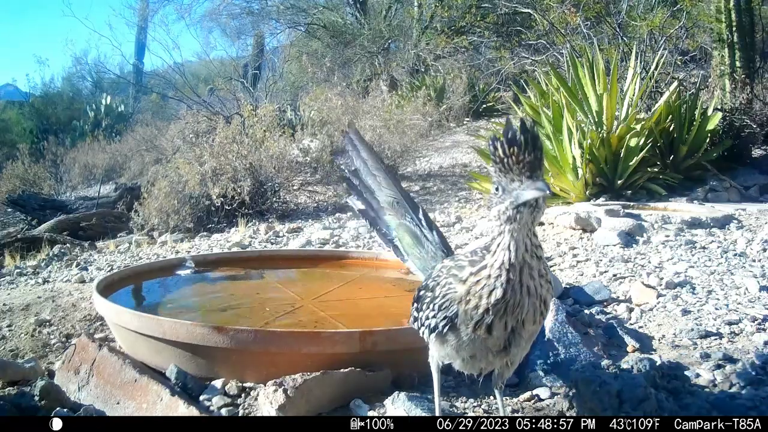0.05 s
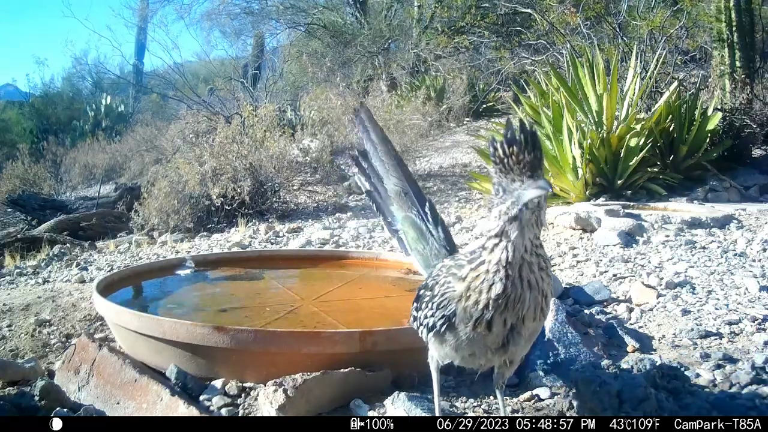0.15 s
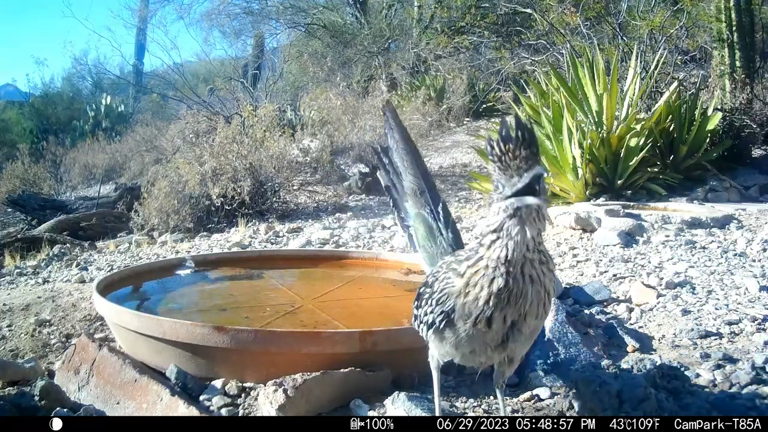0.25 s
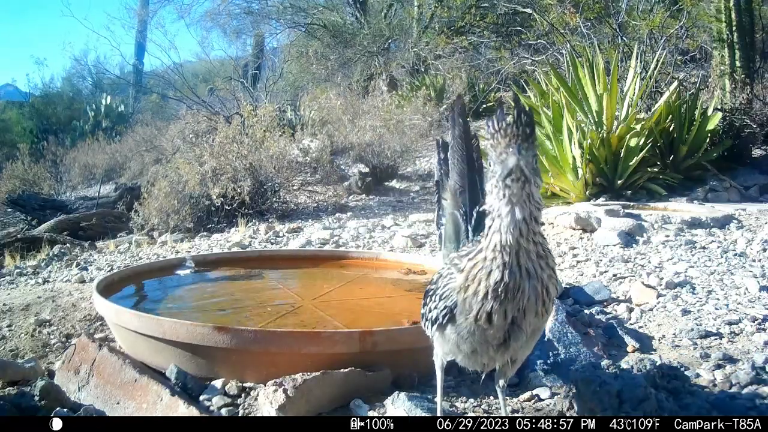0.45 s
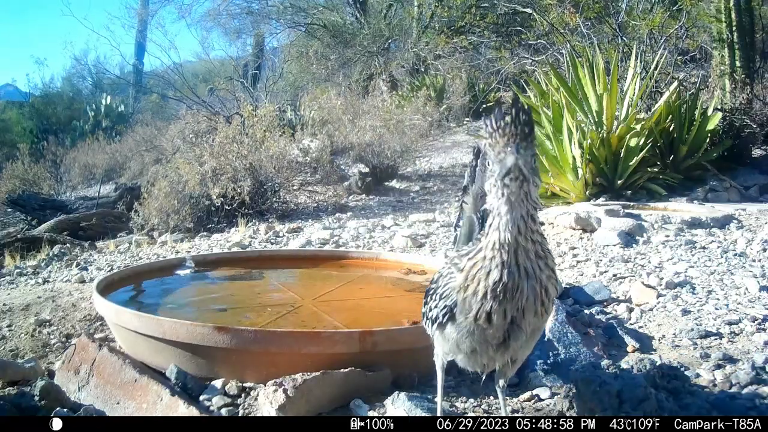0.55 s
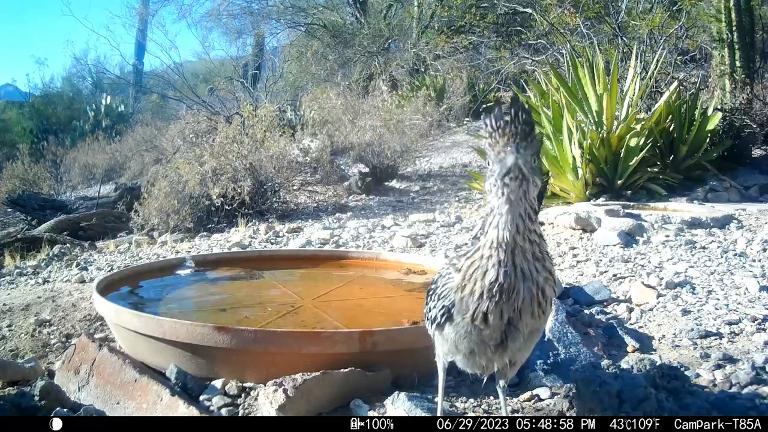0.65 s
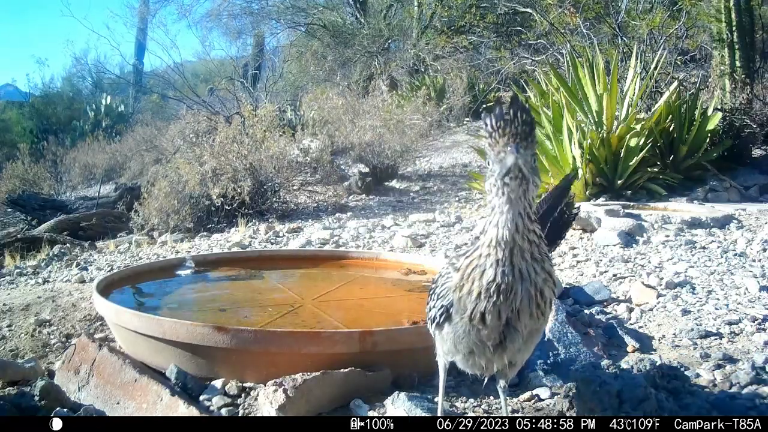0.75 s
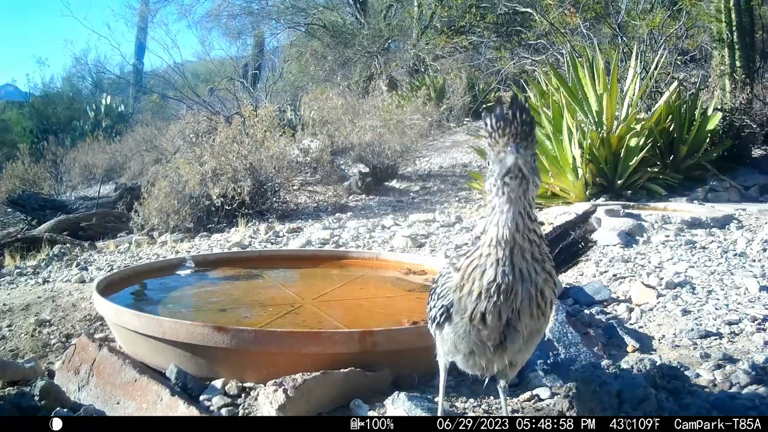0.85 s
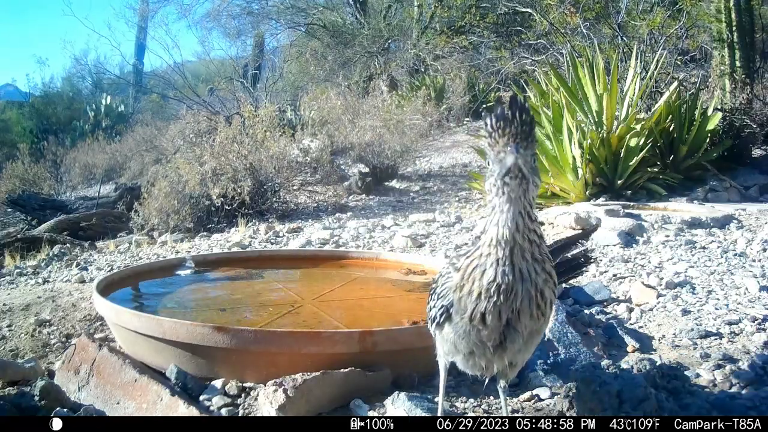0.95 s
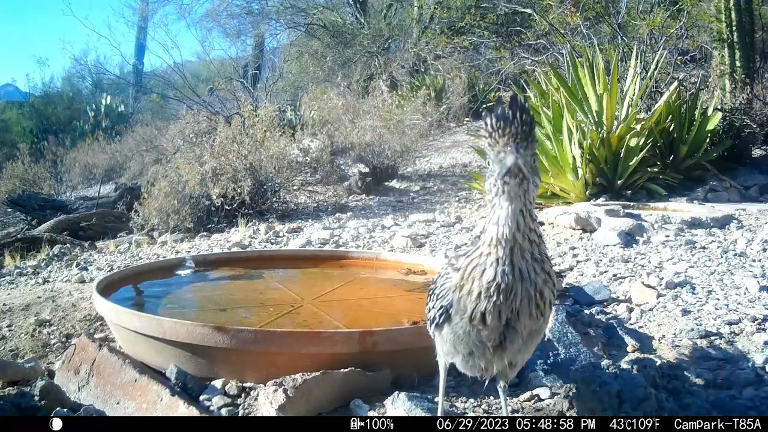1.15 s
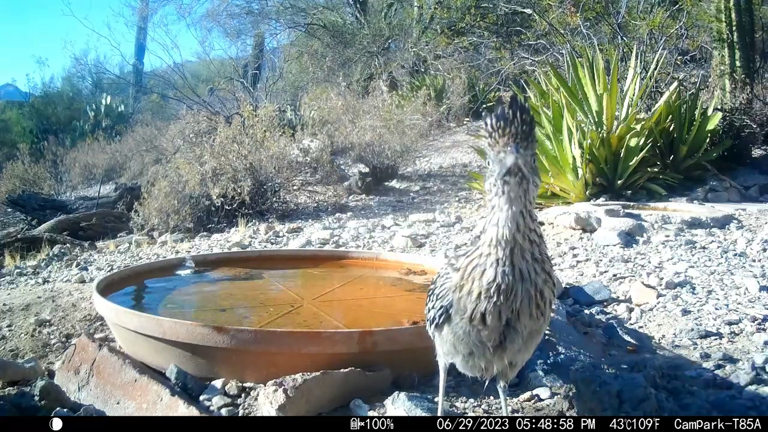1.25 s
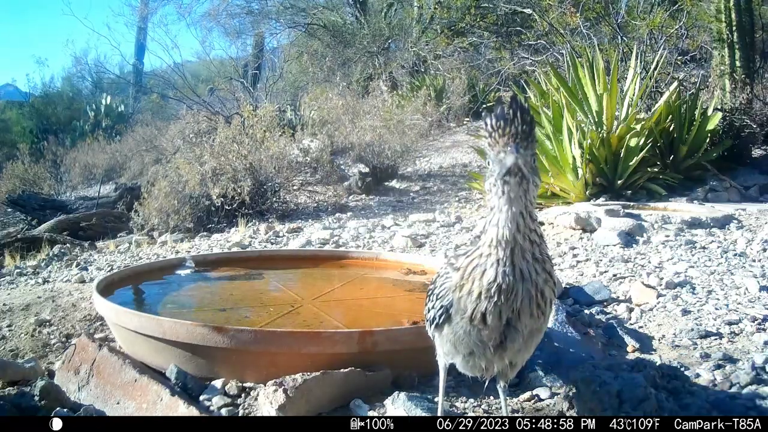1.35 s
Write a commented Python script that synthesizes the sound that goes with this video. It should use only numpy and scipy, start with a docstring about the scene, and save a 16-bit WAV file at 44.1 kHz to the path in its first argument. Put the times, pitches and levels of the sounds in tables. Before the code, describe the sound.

A roadrunner rattles its bill in one quick burst over a soft coo, close up.

```python
"""A quick rattle of six bill claps over a soft arching coo: a roadrunner, close up in a desert garden.
Each snap rings the bill and mouth for a few milliseconds and overloads the microphone; ground, dish
and plants echo it faintly, and a bright fizz trails the last one. The coo is a nearly pure throat tone.
Behind the bird sit quiet air, a low rumble that comes and goes, three soft thumps and microphone hiss."""
import sys
import numpy as np
from scipy import signal
from scipy.fft import rfft, irfft
from scipy.io import wavfile
from scipy.ndimage import uniform_filter1d

SR = 44100
rng = np.random.default_rng(int(sys.argv[2]) if len(sys.argv) > 2 else 0)


def persist_wave(psi):
    """Save psi, clipped to +-1, as 16-bit WAV."""
    counts = np.round(np.clip(psi, -1, 1) * 32767).astype(np.int16)
    wavfile.write(sys.argv[1], SR, np.atleast_2d(counts).T)


N = 61739

# the six bill claps: start_s, strength_db, pitch_ratio
SNAPS = [(0.225, -6, 1.004), (.2620, -0.6, 1.006), (.2970, -0.6, 1.002), (.3301, 1.56, 1.009),
         (.3624, 2.1, .994), (.3932, 1.14, 0.986)]


def undb(db):
    """Decibels to gain."""
    return 10 ** (np.asarray(db) / 20)


def ring_out(age, t60_s):
    """An envelope that falls 60 dB in t60_s."""
    return np.exp(-np.log(1000) * age / t60_s)


def curve(t, table, column=1):
    """One column of a table, joined by straight lines."""
    rows = np.array(table)
    return np.interp(t, rows[:, 0], rows[:, column])


def noise(colour):
    """Noise of rms 1, shaped by rows of freq_hz, relative_db."""
    hz, db = np.array(colour).T
    bins_hz = np.maximum(np.fft.rfftfreq(N, 1 / SR), 1)
    gain = undb(np.interp(np.log(bins_hz), np.log(hz), db))
    shaped = irfft(rfft(rng.standard_normal(N)) * gain, N)
    return shaped / shaped.std()


def wander(rate_hz):
    """A smooth random drift with a spread of 1."""
    hold = int(SR / rate_hz)
    steps = np.repeat(rng.standard_normal(N // hold + 1), hold)
    drift = uniform_filter1d(uniform_filter1d(steps, hold), hold)[:N]
    return drift / drift.std()


def low_pass(x, hz):
    """Steep low-pass without delay."""
    return signal.fftconvolve(x, signal.firwin(401, hz, fs=SR)[None], "same")


def desert_air(t):
    """A faint, barely flickering bed of air under a low rumble that swells and fades."""
    # tone of the still air: freq_hz, relative_db
    air_colour = [(25, -4.5), (60, -8), (120, -9.5), (200, -12), (400, -13), (1000, -24), (2500, -31.5),
                  (8000, -43.5), (15000, -45)]
    # tone of the rumble: freq_hz, relative_db
    rumble_colour = [(20, -4.5), (45, -6), (80, -1), (130, -8.5), (220, -17), (400, -28), (1000, -35.5),
                     (2000, -37.5), (4000, -49.5)]
    # swells of the rumble: time_s, level_db
    rumble_swells = [(0, -37.5), (.08, -60), (.2, -57), (.236, -28), (.27, -53), (.33, -59), (.45, -59.5),
                     (.88, -59.5), (.934, -46.5), (1.016, -51.5), (1.06, -46.5), (1.132, -44),
                     (1.19, -56.5), (1.33, -54), (1.4, -48.5)]
    air_db, flicker_db = -59.5, 0.36
    bed = noise(air_colour) * undb(air_db - flicker_db * wander(rate_hz=24))
    rumble = noise(rumble_colour) * undb(curve(t, rumble_swells))
    return bed + rumble


def thumps(t):
    """Soft, low thumps of a few cycles, likely the bird shifting its body and tail."""
    # bell-shaped bass pulses: centre_s, pitch_hz, level_db, half_length_s
    pulses = [(0.234, 88, -38.5, 0.022), (1.047, 75, -39, 0.01), (1.079, 109, -38.5, 0.0062)]
    out = np.zeros(N)
    for centre_s, pitch_hz, level_db, half_length_s in pulses:
        swell = undb(level_db) * np.exp(-((t - centre_s) / half_length_s) ** 2)
        out += swell * np.sin(2 * np.pi * pitch_hz * (t - centre_s))
    return out


def fizz():
    """A faint, very bright fizz trails the last snap."""
    level_db, delay_s = -41.5, 0.0067
    age = np.arange(N) / SR - SNAPS[-1][0] - delay_s
    high_pass = signal.butter(4, 8600, "high", fs=SR, output="sos")
    treble = signal.sosfilt(high_pass, rng.standard_normal(N))
    return treble * undb(level_db) * (age > 0) * ring_out(np.abs(age), t60_s=0.14)


def garden_echoes(rattle, t):
    """Close surfaces echo each snap; stones scatter it into a short tail, bushes into a longer one."""
    # early reflections: delay_s, level_db
    reflections = [(.0046, -37), (.0098, -43), (0.0129, -40.5)]
    # tone of the scatter from the stones: freq_hz, relative_db
    stone_colour = [(200, -14.5), (700, -11), (1500, 0), (3500, -3), (8000, -5), (12000, -23.5)]
    # tone of the scatter from the bushes: freq_hz, relative_db
    bush_colour = [(100, -6.5), (400, 0.5), (1500, -0.5), (3500, -4.5), (8000, -9.5), (12000, -24)]
    strikes = np.zeros(N)
    for start_s, strength_db, _ in SNAPS:
        strikes[int(start_s * SR)] = undb(strength_db)
    stones = noise(stone_colour) * undb(-27) * ring_out(t, t60_s=0.044)
    bushes = noise(bush_colour) * undb(-46) * ring_out(t, t60_s=0.26)
    echoes = sum(undb(db) * np.roll(rattle, int(delay_s * SR)) for delay_s, db in reflections)
    return echoes + signal.fftconvolve(strikes, stones + bushes)[:N]


def coo(t):
    """A throat tone and its faint octave rise and sag; the closing bill muffles them before each snap."""
    # arch of the coo: time_s, pitch_hz, fundamental_db, octave_db
    arch = [(.218, 300, -65.5, -72), (.236, 330.5, -30.5, -47), (.262, 369.1, -30, -50),
            (.300, 355.5, -28, -46.5), (.340, 346, -27.5, -45), (.380, 329.5, -27, -40),
            (.396, 278.8, -40.5, -41.5), (.415, 279, -34.5, -47.5), (.426, 252.5, -47.5, -58.5),
            (.470, 234, -75, -78.5)]
    jitter = 0.0033
    muffle_depth, lead_s, width_s = 0.62, 0.006, 0.005
    pitch_hz = curve(t, arch) * (1 + jitter * wander(rate_hz=150))
    phase = 2 * np.pi * np.cumsum(pitch_hz) / SR
    fundamental = undb(curve(t, arch, column=2)) * np.sin(phase)
    octave = undb(curve(t, arch, column=3)) * np.sin(2 * phase)
    bill_shut = sum(np.exp(-((t - start_s + lead_s) / width_s) ** 2) for start_s, _, _ in SNAPS)
    sounding = (t > arch[0][0]) & (t < arch[-1][0])
    return np.sqrt(2) * (fundamental + octave) * sounding * (1 - muffle_depth * bill_shut)


def bill_snaps(t):
    """Each clap of the mandibles strikes the same short modes at a slightly different pitch."""
    # modes of bill and mouth: pitch_hz, relative_db, t60_s
    bill_modes = [(1090, -4, .0041), (1663, -9, 0.011), (2006, 0.43, .0041), (2565, 3, 0.0046),
                  (2718, 8, .007), (3360, -0.54, .0041), (3884, -0.63, 0.0046), (4818, -15, .0067),
                  (5270, -0.5, 0.0038), (5740, -22, .0136), (6510, -9.5, .0068), (7140, -21.5, 0.015),
                  (7930, -9, .0125), (8195, -9, 0.0098)]
    gain_db = 1.5
    rebound_s, rebound_db = 0.00057, -10  # the mandibles touch a second time
    pitch_hz, mode_db, t60_s = np.array(bill_modes).T[:, :, None]
    age = t[:SR // 25]
    envelopes = undb(mode_db) * ring_out(age, t60_s)
    out = np.zeros(N)
    for start_s, strength_db, pitch_ratio in SNAPS:
        ring = (envelopes * np.sin(2 * np.pi * pitch_hz * pitch_ratio * age)).sum(0)
        for delay_s, contact_db in ((0, 0), (rebound_s, rebound_db)):
            first = int(start_s * SR) + int(delay_s * SR)
            out[first:first + len(age)] -= undb(gain_db + strength_db + contact_db) * ring
    # so small a source radiates little bass
    return signal.sosfilt(signal.butter(2, 900, "high", fs=SR, output="sos"), out)


def scene():
    """The rattling, cooing bird in the garden, in mono."""
    t = np.arange(N) / SR
    rattle = bill_snaps(t)
    return (rattle + garden_echoes(rattle, t) + coo(t) + thumps(t) + desert_air(t))[None]


def record(dry):
    """The snaps' peaks are flattened and the scene is dulled above 8.6 kHz; hiss and fizz join after."""
    ceiling, knee = 0.75, 4.0
    scene_top_hz, output_top_hz, hiss_db = 8600, 15400, -66.5
    flattened = dry / (1.5 + np.abs(dry / ceiling) ** knee) ** (1 / knee)
    hiss = undb(hiss_db) * rng.standard_normal(N)
    return low_pass(low_pass(flattened, scene_top_hz) + hiss + fizz(), output_top_hz)


dry = scene()
out = record(dry)
persist_wave(out)
```